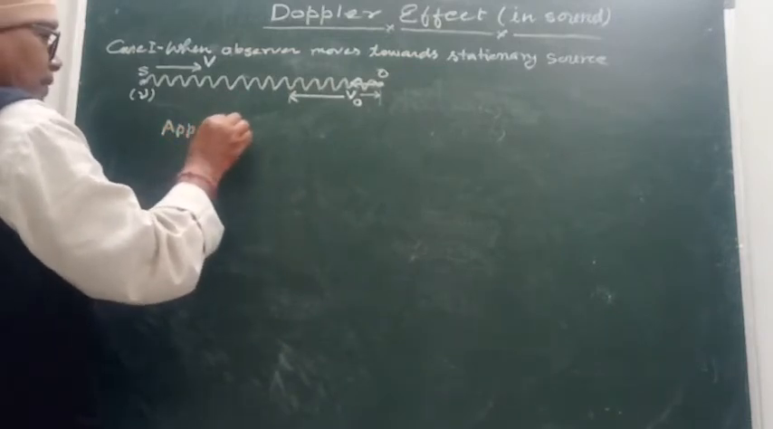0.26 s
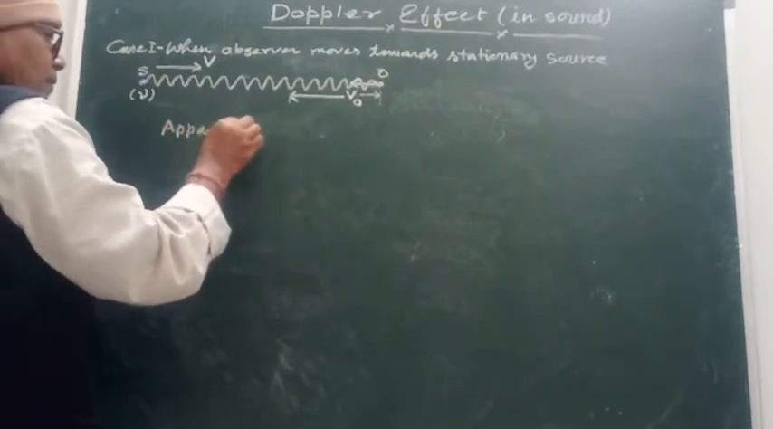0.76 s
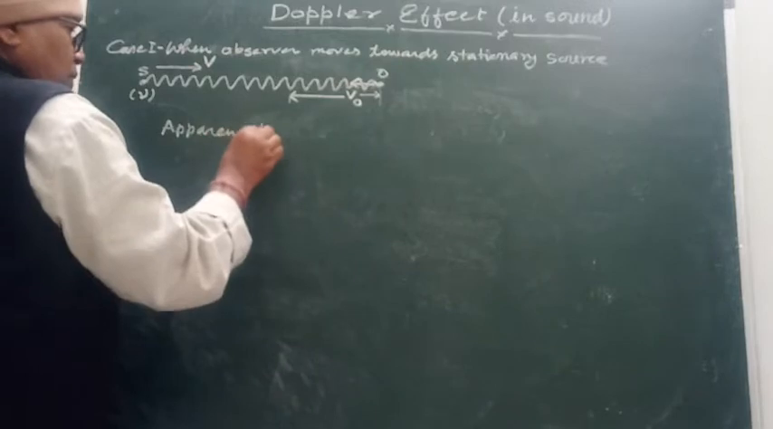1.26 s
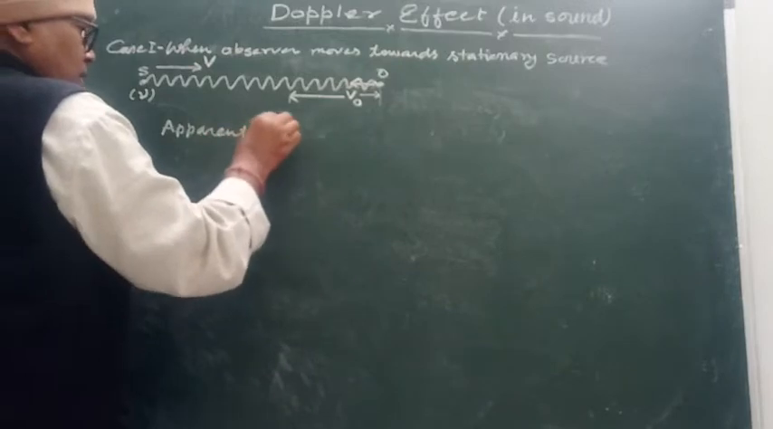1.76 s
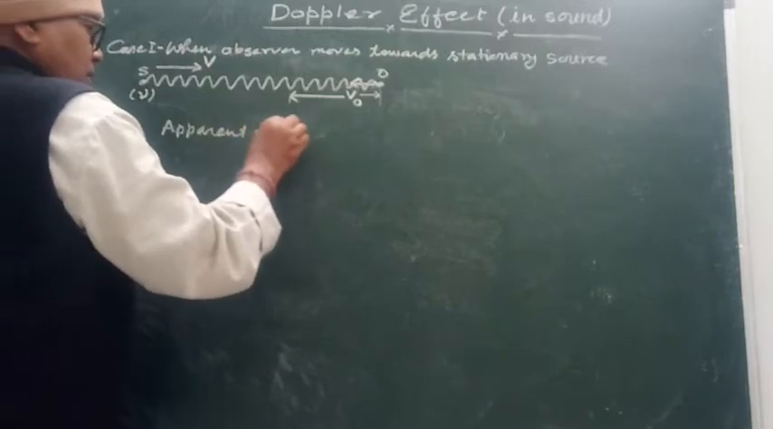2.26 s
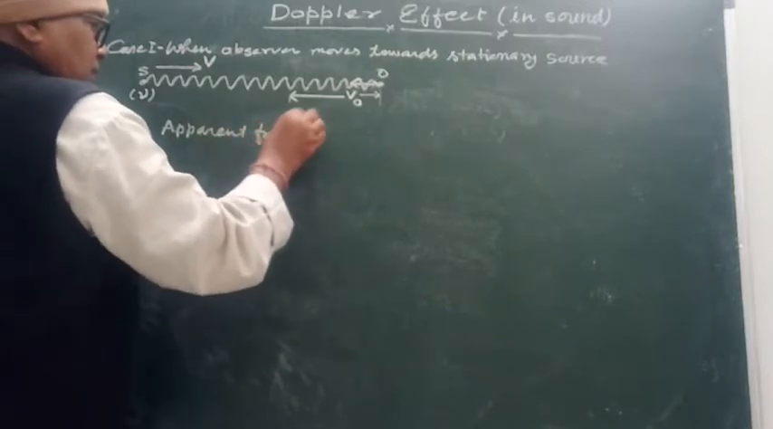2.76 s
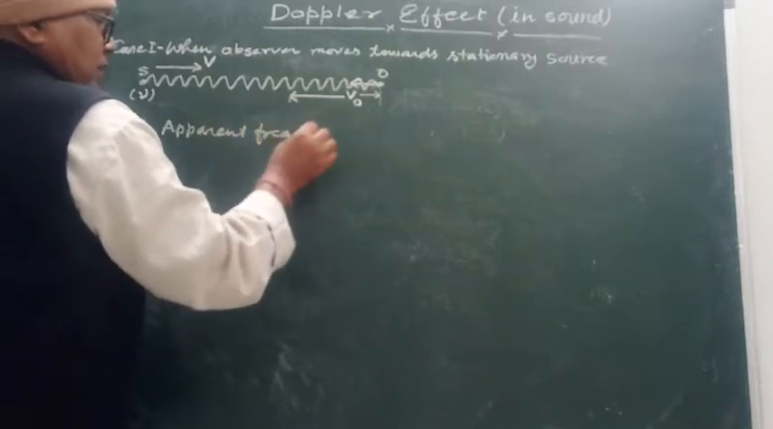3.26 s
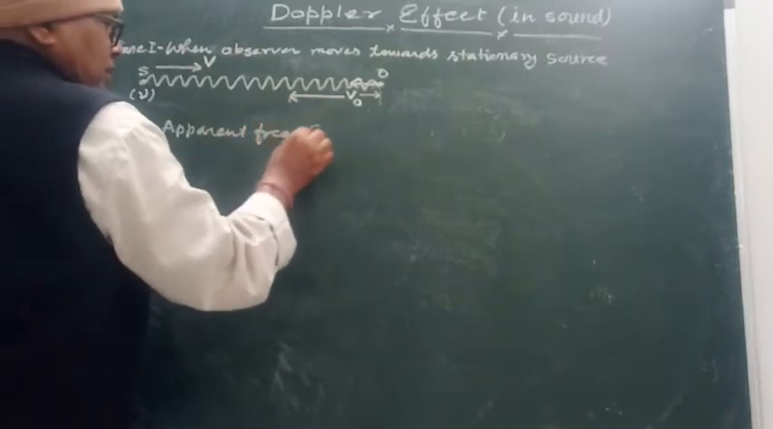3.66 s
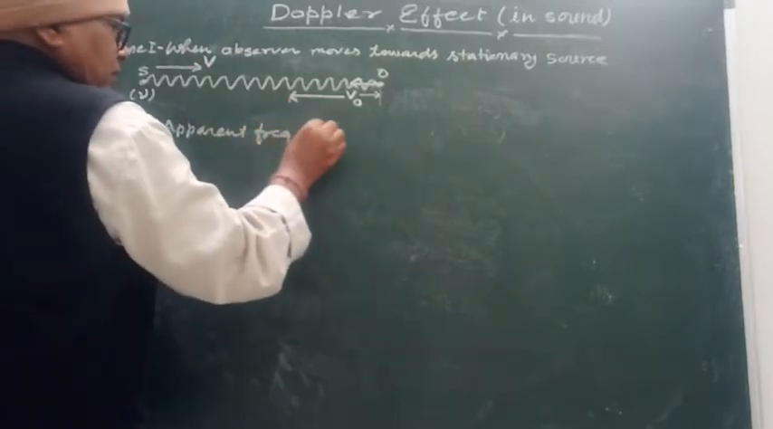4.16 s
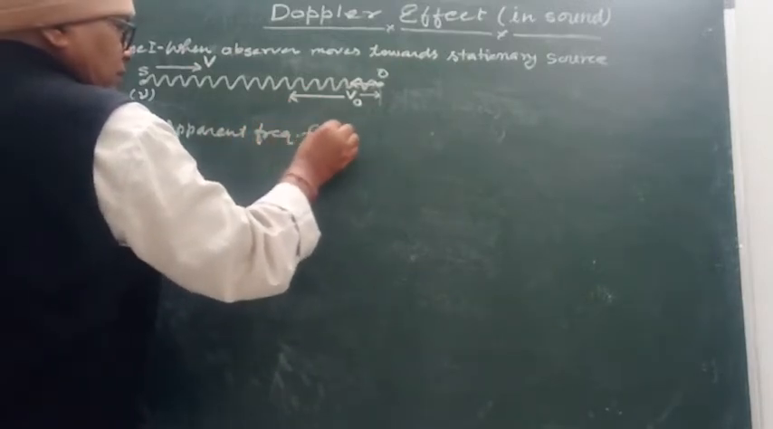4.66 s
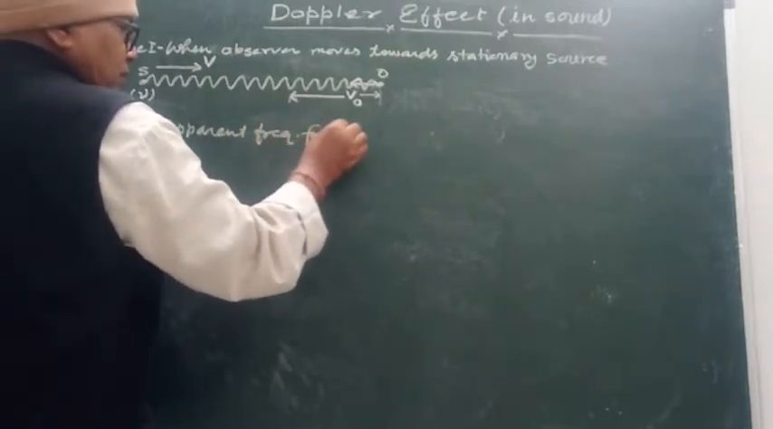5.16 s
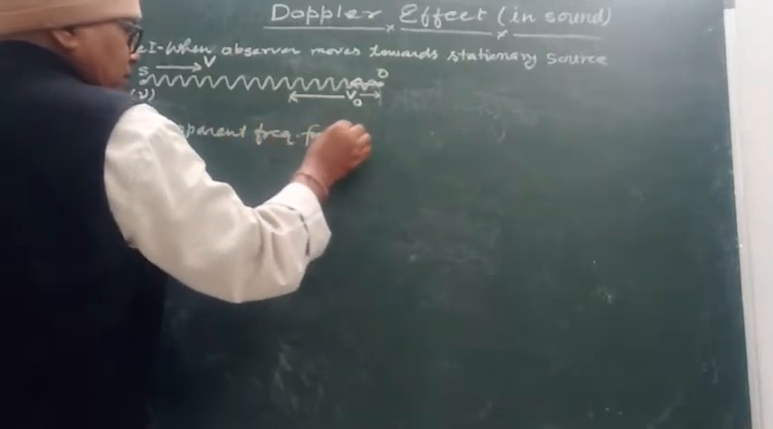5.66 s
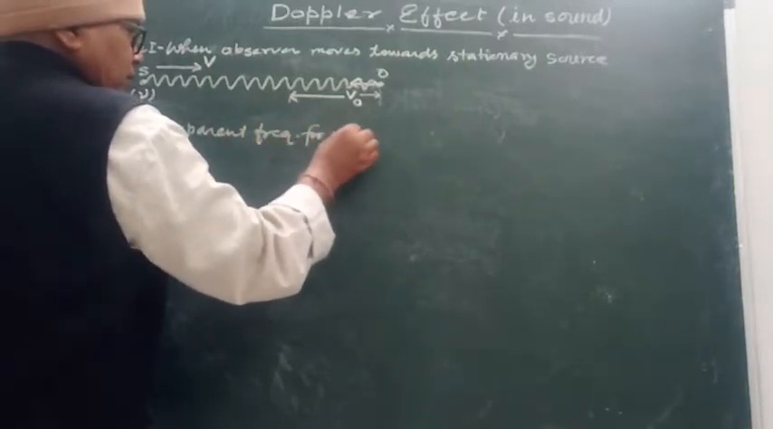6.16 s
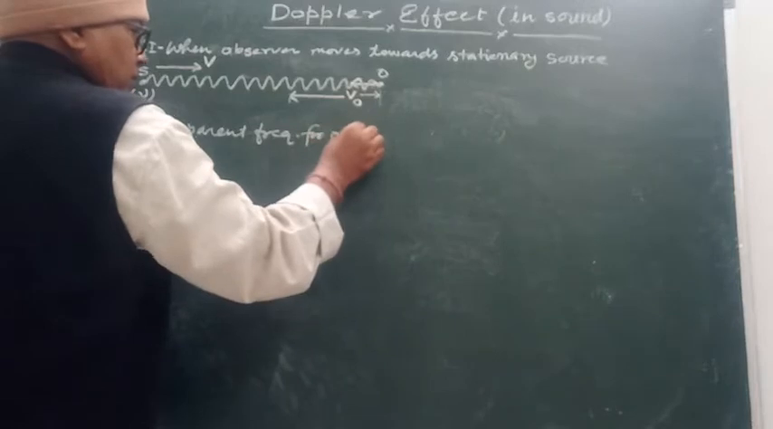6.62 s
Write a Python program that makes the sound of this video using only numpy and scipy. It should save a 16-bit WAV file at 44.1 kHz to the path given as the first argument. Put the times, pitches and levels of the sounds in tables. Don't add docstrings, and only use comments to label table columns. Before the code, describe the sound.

Chalk writes on a hollow blackboard in an echoing room: quick gritty scratches, sharp hard taps and dull knocks over faint low rumble and hiss.

```python
import sys
import numpy as np
from scipy import signal
from scipy.io import wavfile

SR = 44100
rng = np.random.default_rng(int(sys.argv[2]) if len(sys.argv) > 2 else 0)


def log_audio(samples):
    frames = np.atleast_2d(samples).T
    limited = np.clip(frames, -1, 1)
    pcm = np.round(limited * 32767).astype(np.int16)
    wavfile.write(sys.argv[1], SR, pcm)


def gain_from_decibels(decibels):
    exponent = np.asarray(decibels, float) / 20
    return 10 ** exponent


N = 303893

# peak in seconds, length in seconds, panel drone in dB, scratch in dB, tip hiss in dB.
LOOPS = [(.112, 0.1, -47.5, -41.5, -50.5), (.24, 0.098, -53.5, -51.5, -55), (.83, 0.13, -58.5, -57, -58.5),
         (1.256, .2, -40.5, -42, -48.5), (1.43, 0.16, -36.5, -38, -48.5), (1.57, 0.24, -47, -45.5, -49.5),
         (1.97, .14, -44, -55.5, -57.5), (2.102, 0.21, -44.5, -44, -48.5), (2.378, 0.12, -43.5, -46.5, -53),
         (2.5, 0.16, -44.5, -50.5, -49.5), (3.675, 0.21, -44.5, -47.5, -50), (3.915, 0.13, -43.5, -45, -52),
         (4.045, 0.17, -51.5, -58, -60.5), (4.165, 0.082, -42.5, -50.5, -59),
         (4.84, 0.3, -46.5, -49.5, -58), (4.955, .15, -48.5, -45, -54.5), (5.266, 0.15, -44.5, -57, -56),
         (5.85, 0.25, -48.5, -53, -57.5), (6.075, 0.06, -38.5, -50, -56), (6.165, 0.19, -43.5, -54, -59.5),
         (6.265, 0.091, -43, -50, -58), (6.55, 0.15, -39.5, -53, -64), (6.885, 0.096, -68, -56, -68)]
PULLS = [(.365, 0.087, -50.5, -45.5, -55.5), (.625, 0.14, -40.5, -36.5, -49.5),
         (.77, 0.15, -45, -45, -48.5), (.54, 0.15, -47.5, -48, -54), (1.815, 0.14, -51, -41.5, -46.5),
         (1.775, 0.14, -47.5, -49, -55), (2.275, 0.14, -36.5, -49, -51),
         (2.627, 0.072, -41.5, -43.5, -50.5), (4.285, 0.29, -45.5, -53.5, -60),
         (4.365, 0.046, -38.5, -59, -64), (4.452, .13, -40.5, -47.5, -55.5), (5.93, 0.12, -46, -51, -70),
         (6.825, 0.15, -38, -44, -55)]
SKIDS = [(.005, 0.3, -49, -49.5, -55.5), (.965, 0.066, -37.5, -40, -49.5), (1.2, 0.084, -36, -38.5, -68),
         (2.792, 0.14, -37.5, -38.5, -62), (3.532, 0.11, -43, -50, -65), (3.578, 0.096, -53, -51.5, -54),
         (3.882, 0.096, -43, -51, -55), (4.728, 0.12, -41.5, -47.5, -55), (5.205, 0.17, -65, -44, -56),
         (5.34, 0.023, -62, -49, -54.5), (5.704, 0.14, -52, -54.5, -64), (6.445, .08, -60, -49, -67),
         (6.643, 0.16, -45.5, -52.5, -58.5)]
LOOP_RISE, PULL_RISE, SKID_RISE = 0.53, 0.8, 0.21
FADE_DB, FADE_SHAPE = 23.5, 2.31
DRONE_FADE, DUST_FADE = 0.56, 1.45

# start in seconds, scratch tilt in dB per octave,
# hiss tilt in dB per octave, dust over hiss in dB.
GRIPS = [
    (0, -2.3, -0.5, -6.5),
    (.44, -3, -3.5, -7.5),
    (1.0, -4, .1, -8),
    (1.9, 0.8, 1.5, -7.5),
    (3.0, 1.5, -.5, -5),
    (3.86, -0.5, -6, -5.5),
    (4.6, -2.5, -7, -7.5),
    (5.5, -1.5, -4, -7),
]

# frequency in Hz, width in Hz, level in dB.
DRONE_PEAKS = [(104.5, 9.7, -11), (259, 8.9, -8.5), (280, 130, -22.5), (321.5, 34, 3.5),
               (429.3, 33.5, -0.5), (456, 103, -4.5), (673, 173, -15.5), (828, 127, -11.5)]
SCRATCH_PEAKS = [(780.4, 81.4, -2.5), (900, 480, -9), (1144, 135, -2), (1326, 146, -5.5), (1873, 224, -5.5),
                 (2192, 200, -6), (2500, 900, -8), (3220, 610, -9), (3820, 410, -12.5), (4500, 430, -15.5)]
HISS_PEAKS = [(5537, 590, -2.5), (5980, 410, 2.5), (6400, 630, 1.3), (7170, 710, 1.4), (8170, 1150, -0.5),
              (9100, 650, 0.5)]
DUST_PEAKS = [(10330, 2700, 1.2), (12250, 610, 5.2), (13800, 1900, 0), (14700, 1500, -8)]

# time in seconds, peak in dB, panel boom in dB, tip click in dB, hard edge in dB.
TAPS = [(0.9255, -4, -15, -23.5, -12.5), (1.161, -3, -14.5, -26, -11), (2.749, -3.5, -16, -16, -6.5),
        (3.4961, -9.5, -13.5, -24.5, -14), (3.859, -18.5, -4, -18.5, -41), (4.177, -30.5, -4, -44, -18),
        (4.674, -11, -4, -14, -9.5), (5.1485, -6.5, -9.5, -15, -8), (5.345, -35, -23, -14, -17),
        (5.62, -20, -7, -55, -37), (6.019, -21.5, -1.5, -27, -30), (6.4097, -10.5, -8.5, -30, -13)]
BOUNCE_MS, THUD_UNDER_BOOM_DB = 1.388, 18

# frequency in Hz, level in dB, T60 in seconds.
PANEL_MODES = [(250, -7, 0.06), (295, -3, 0.07), (327, 2, 0.1), (359, -10.5, 0.1), (410, -4, 0.055),
               (497, -3, 0.034), (554, -16, 0.06), (622, -9, 0.07), (667, -14, 0.038), (740, -16, 0.05)]
THUD_MODES = [(60.7, -9, 0.24), (83.6, -21, 0.1), (96.5, -8, 0.49), (120.8, -7.5, 0.24), (157, -13, 0.1),
              (191.4, -4, 0.15)]
KNOCK_MODES = [(860, -4, .011), (980, -5, .01), (1110, 0, .011), (1330, 2, .01), (1500, -1, .009),
               (1720, 2, .009), (1980, 0, .007)]
EDGE_MODES = [(2340, -10, 0.023), (2900, 0, 0.0073), (3300, 1.5, 0.0055), (3970, -5.5, 0.004),
              (4500, -27, 0.0055)]
TIP_MODES = [(5080, 4, 0.0027), (7050, 9, 0.0015), (7500, 3, 0.001), (8360, -4, 0.0038), (9700, -3, 0.0028)]
BUMP_MODES = [(115, -9.5, 0.33), (180, -3.5, 0.098), (265, -15, 0.21)]
TICK_MODES = [(1265, 1.5, 0.022), (1740, -3.5, 0.016), (2470, 6, 0.0031), (7000, -16, .003)]

# time in seconds, peak in dB, low body in dB.
BUMPS = [
    (1.092, -23, -5),
    (2.714, -28, 0.5),
    (2.924, -20, -2),
    (3.062, -29, -1),
]

# time in seconds, peak in dB.
TICKS = [
    (1.8376, -27),
    (2.6315, -34),
]

# delay in ms, level in dB.
NEAR_ECHOES = [(6.5, -11.5), (9.5, -11.5), (14, -28.5), (27, -16.5)]
# frequency in Hz, T60 in seconds.
ROOM_T60 = [(80, 0.81), (250, 0.69), (800, 2.44), (2000, 1.9), (4000, 0.62), (8000, 1.42), (15000, 0.046)]
# frequency in Hz, level in dB.
ROOM_TONE = [(80, 5.5), (250, 6), (800, -5), (2000, -5.5), (4000, 4.5), (8000, -5), (15000, -6)]
ROOM_DB, ROOM_RISE_S, ECHO_CUT_HZ = -16, 0.04, 1900
SCATTER_DB, SCATTER_S = -13.5, 0.019

# frequency in Hz, density in dB per Hz.
AIR_SPECTRUM = [(15, -30), (30, 6), (137, -2.5), (301, -5), (600, -28.5), (2550, -16.5), (4490, -23),
                (16000, -27)]
AIR_DB = -55.5
MIC_LOW_HZ, MIC_HIGH_HZ = 75.6, 15650


def strokes():
    from_s, *columns = np.transpose(GRIPS)
    grip = np.maximum(np.searchsorted(from_s, np.arange(N) / SR) - 1, 0)
    scratch_tilt_db, hiss_tilt_db, dust_db = np.array(columns)[:, grip]
    drone_gain, scratch_gain, hiss_gain, dust_gain = contact()
    coarse = grit(7000, spread_db=5.0, judder_db=-0.5)
    fine = grit(14000, spread_db=3.5, judder_db=1.5)
    drone = resonate(drone_gain * coarse, DRONE_PEAKS, patchy_db=3.5) * np.sqrt(np.mean(drone_gain ** 2))
    scratch = resonate(coarse, SCRATCH_PEAKS, patchy_db=1.5, tilt_db=scratch_tilt_db)
    hiss = resonate(fine, HISS_PEAKS, patchy_db=1.7, tilt_db=hiss_tilt_db)
    dust = resonate(fine, DUST_PEAKS, patchy_db=1.0)
    return gain_from_decibels(-1.5) * drone + scratch_gain * scratch + hiss_gain * hiss + dust_gain * gain_from_decibels(dust_db) * dust


def contact():
    power = np.zeros((4, N))
    t = np.arange(N) / SR
    for rows, rise in ((LOOPS, LOOP_RISE), (PULLS, PULL_RISE), (SKIDS, SKID_RISE)):
        for peak_s, length_s, drone_db, scratch_db, hiss_db in rows:
            start = max(int((peak_s - 2 * length_s) * SR), 0)
            near = slice(start, int((peak_s + 2 * length_s) * SR))
            late = (t[near] - peak_s) / length_s
            from_peak = np.where(late < 0, -late / rise, late / (1 - rise))
            loss_db = FADE_DB * from_peak ** FADE_SHAPE
            power[:, near] += gain_from_decibels([drone_db - DRONE_FADE * loss_db, scratch_db - loss_db,
                                   hiss_db - loss_db, hiss_db - DUST_FADE * loss_db]) ** 2
    return np.sqrt(power)


def grit(per_s, spread_db, judder_db):
    sizes = gain_from_decibels(spread_db * np.minimum(rng.exponential(1, N), 4))
    sizes = sizes * rng.choice([-1, 1], N)
    breaks = rng.random(N) < per_s / SR
    return sizes * breaks * gain_from_decibels(judder_db * drift(120))


def resonate(drive, peaks, patchy_db, tilt_db=0):
    out = 0
    middle_oct = np.mean(np.log2(np.array(peaks)[:, 0]))
    for k, (hz, width_hz, level_db) in enumerate(peaks):
        r, w = np.exp(-np.pi * width_hz / SR), 2 * np.pi * hz / SR
        band = signal.lfilter([1 - r * r, 0, r * r - 1], [1, -2 * r * np.cos(w), r * r], drive)
        gain_db = level_db + tilt_db * (np.log2(hz) - middle_oct) + patchy_db * drift(3.8)
        out = out + (-1) ** k * gain_from_decibels(gain_db) * band
    return rms_one(out)


def taps():
    s, peak_db, boom_db, click_db, edge_db = np.transpose(TAPS)
    s = s + 0.0014
    again = s + BOUNCE_MS / 1000 * rng.uniform(0.8, 1.25, len(s))
    knock = strike(s, peak_db - 14, KNOCK_MODES, spread_db=1.5, stagger_ms=0.25)
    knock -= strike(again, peak_db - 14, KNOCK_MODES, spread_db=2, stagger_ms=1.2)
    edge = strike(s, peak_db + edge_db - 7.5, EDGE_MODES, spread_db=0.5)
    edge += strike(again, peak_db + edge_db - 5, EDGE_MODES, spread_db=1.5, stagger_ms=1.5)
    click = strike(s, peak_db + click_db - 6.5, TIP_MODES, spread_db=2)
    click += strike(again, peak_db + click_db - 16, TIP_MODES, spread_db=2)
    boom = strike(s, peak_db + boom_db - 7, PANEL_MODES, spread_db=2.0, stagger_ms=1.41)
    thud = np.zeros(N)
    thud_db = peak_db + boom_db - THUD_UNDER_BOOM_DB
    for late_s in (0.018, 0.034, 0.06):
        thud += strike(s + late_s, thud_db, THUD_MODES, spread_db=0.5, stagger_ms=11.9)
    hard = soften(knock, 2720) + soften(edge, 4150) + soften(click, 8900)
    return hard + soften(boom, 1840) + soften(thud, 190)


def bumps():
    s, peak_db, low_db = np.transpose(BUMPS)
    knocks = np.zeros(N)
    for late_s, loss_db in ((0.002, 16.9), (0.004, 22), (0.011, 25)):
        knocks += strike(s + late_s, peak_db - loss_db, [*KNOCK_MODES, *PANEL_MODES], spread_db=7.5)
    body = strike(s + 0.00464, peak_db + low_db - 0.5, BUMP_MODES, spread_db=1.0)
    return soften(knocks, 2250) + soften(body, 440)


def ticks():
    s, peak_db = np.transpose(TICKS)
    return soften(strike(s, peak_db - 6, TICK_MODES, spread_db=1), 9000)


def strike(at_s, peak_db, modes, spread_db, stagger_ms=0):
    out = np.zeros(N)
    own_db = spread_db * rng.standard_normal((len(at_s), len(modes)))
    delay_s = stagger_ms / 1000 * rng.random(own_db.shape)
    at = np.round((at_s[:, None] + delay_s) * SR).astype(int)
    for k, (hz, level_db, t60_s) in enumerate(modes):
        clicks = np.zeros(N)
        clicks[at[:, k]] = gain_from_decibels(peak_db + level_db + own_db[:, k])
        out += ring(clicks, hz, t60_s)
    return out


def ring(clicks, hz, t60_s):
    r, w = gain_from_decibels(-60 / (t60_s * SR)), 2 * np.pi * hz / SR
    return signal.lfilter([0, np.sin(w)], [1, -2 * r * np.cos(w), r * r], clicks + 1e-18)


def soften(x, hz):
    return signal.sosfilt(signal.butter(4, hz, fs=SR, output="sos"), x)


def classroom(x):
    t = np.arange(N) / SR
    tail = np.zeros(N)
    for hz, band in bands():
        tail += gain_from_decibels(at_hz(ROOM_TONE, hz) - 60 * t / at_hz(ROOM_T60, hz)) * band
    tail = tail * (1 - np.exp(-(t / ROOM_RISE_S) ** 2))
    tail = gain_from_decibels(ROOM_DB) * tail / np.sqrt(np.sum(tail ** 2))
    scatter = rng.standard_normal(N) * np.exp(-t / SCATTER_S)
    scatter = scatter * gain_from_decibels(SCATTER_DB) / np.sqrt(SCATTER_S * SR / 2)
    echoes = np.zeros(N)
    for delay_ms, level_db in NEAR_ECHOES:
        echoes[round(delay_ms * SR / 1000)] = gain_from_decibels(level_db)
    return signal.fftconvolve(x, tail + scatter + soften(echoes, ECHO_CUT_HZ))[:N]


def air():
    noise = np.zeros(N)
    for hz, band in bands():
        noise += gain_from_decibels(at_hz(AIR_SPECTRUM, hz) + 1.3 * drift(29.0)) * band
    return gain_from_decibels(AIR_DB) * rms_one(noise)


def bands():
    edges_hz = 22 * 2 ** np.arange(0, 9.6, 0.5)
    white = rng.standard_normal((2, N))
    for k, (low, high) in enumerate(zip(edges_hz, edges_hz[1:])):
        band_pass = signal.butter(2, [low, high], "band", fs=SR, output="sos")
        yield np.sqrt(low * high), signal.sosfilt(band_pass, white[k % 2])


def at_hz(points, hz):
    table_hz, values = np.transpose(points)
    return np.interp(np.log(hz), np.log(table_hz), values)


def drift(rate_hz):
    r = np.exp(-2 * np.pi * rate_hz / SR)
    slow = signal.lfilter([1], [1, -2 * r, r * r], rng.standard_normal(N + SR))
    return rms_one(slow[SR:])


def rms_one(x):
    return x / np.sqrt(np.mean(x ** 2) + 1e-20)


def scene():
    board = strokes() + taps() + bumps() + ticks()
    return (board + classroom(board) + air())[None]


def roll_off(x):
    return signal.sosfilt(signal.butter(12, 16480, fs=SR, output="sos"), x)


def record(dry):
    mic = signal.sosfilt(signal.butter(2, MIC_LOW_HZ, "high", fs=SR, output="sos"), dry)
    mic = signal.sosfilt(signal.ellip(12, 0.5, 60, MIC_HIGH_HZ, fs=SR, output="sos"), mic)
    return roll_off(mic)


dry = scene()
out = record(dry)
log_audio(out)
```